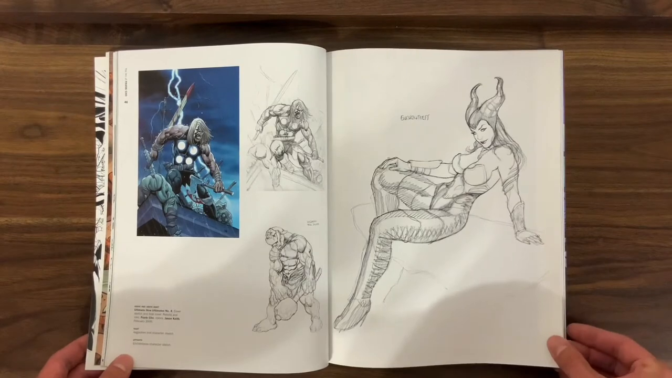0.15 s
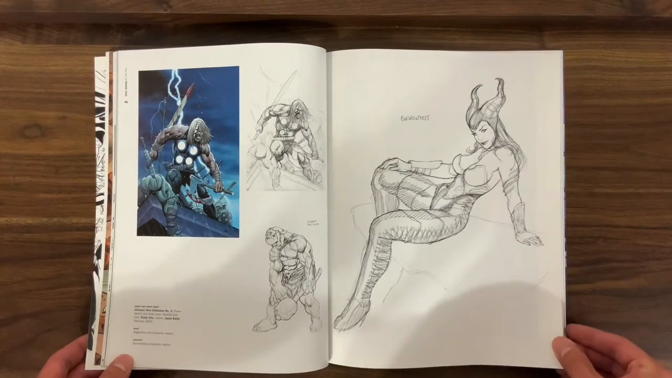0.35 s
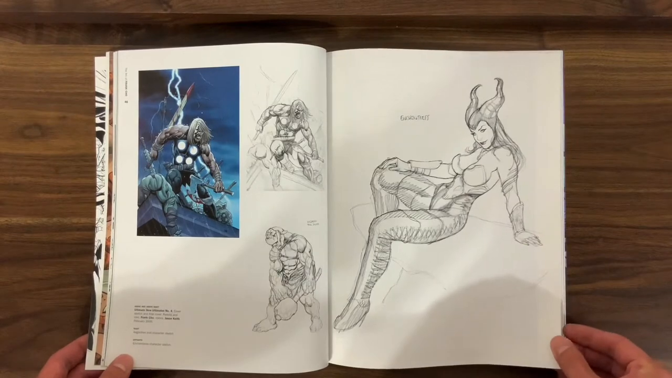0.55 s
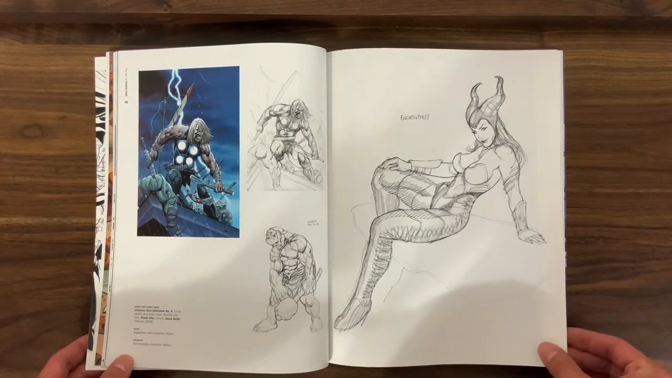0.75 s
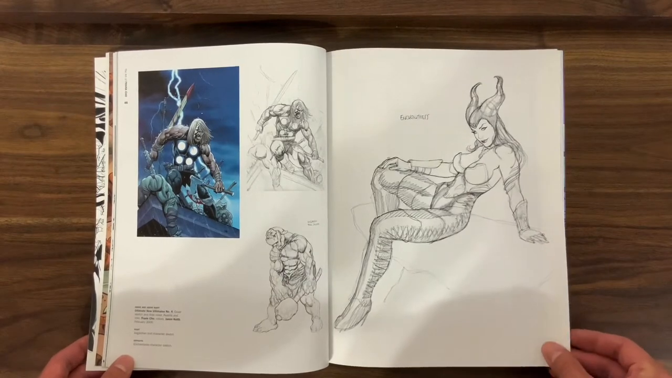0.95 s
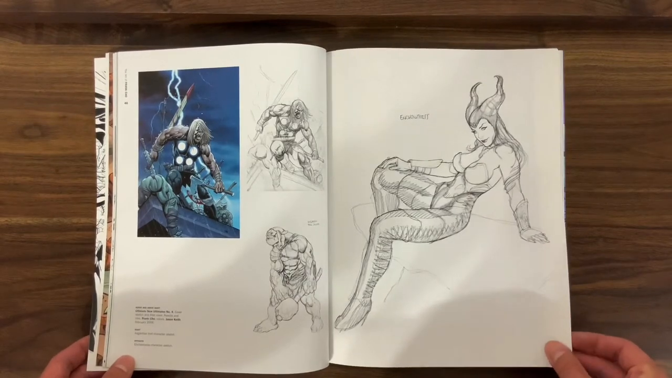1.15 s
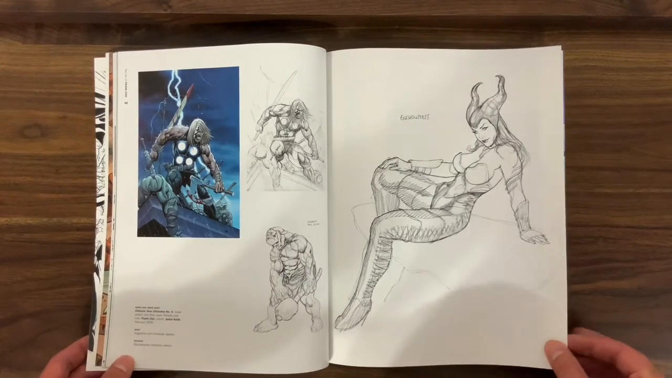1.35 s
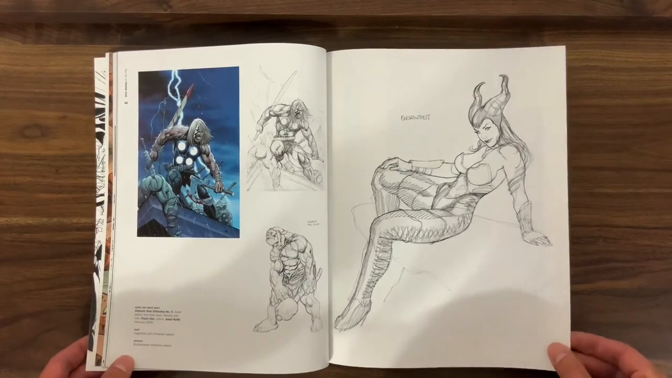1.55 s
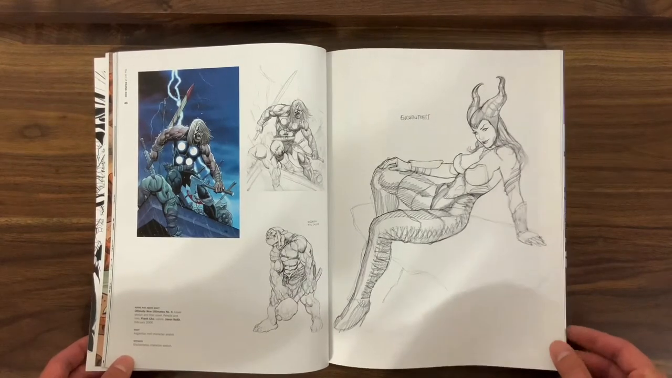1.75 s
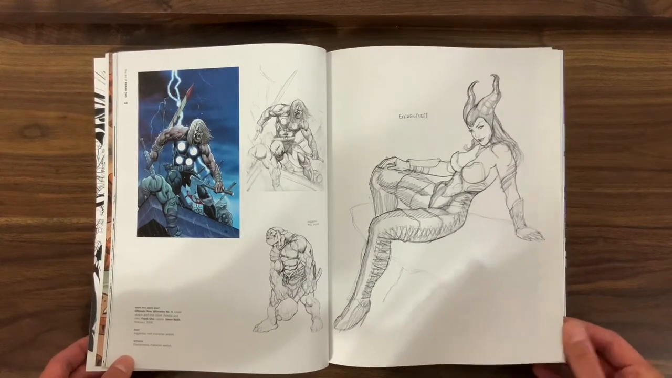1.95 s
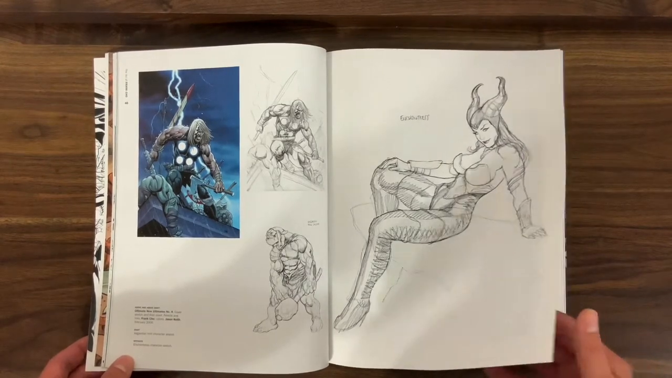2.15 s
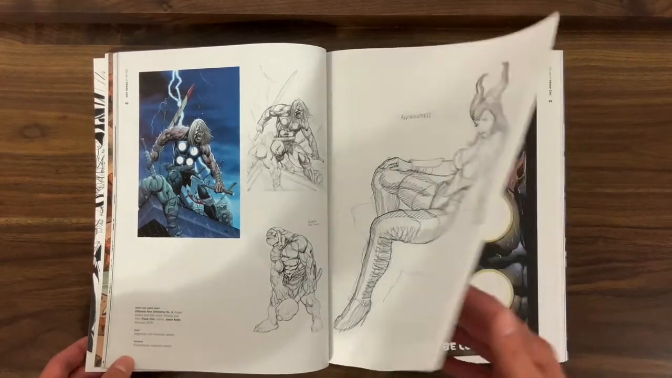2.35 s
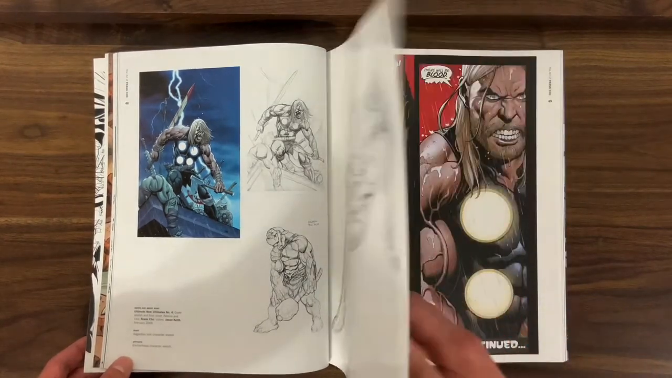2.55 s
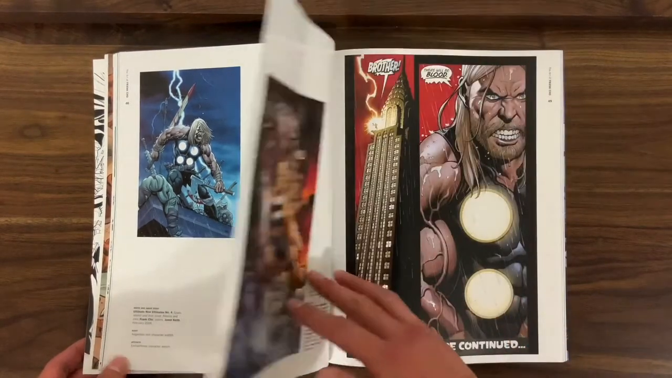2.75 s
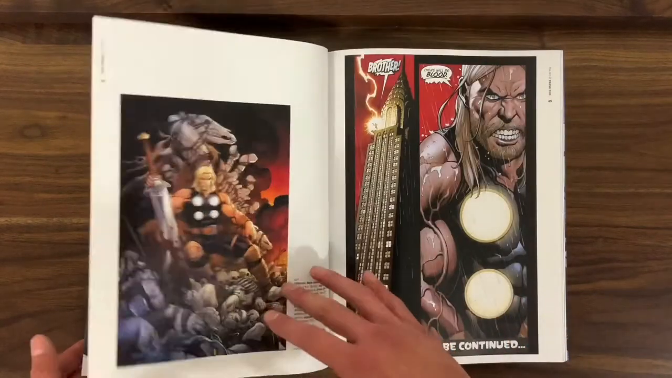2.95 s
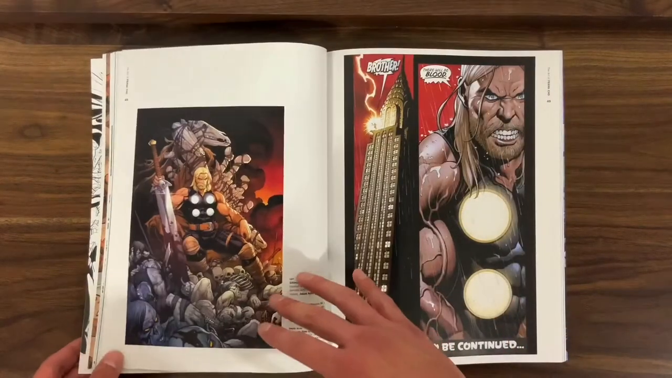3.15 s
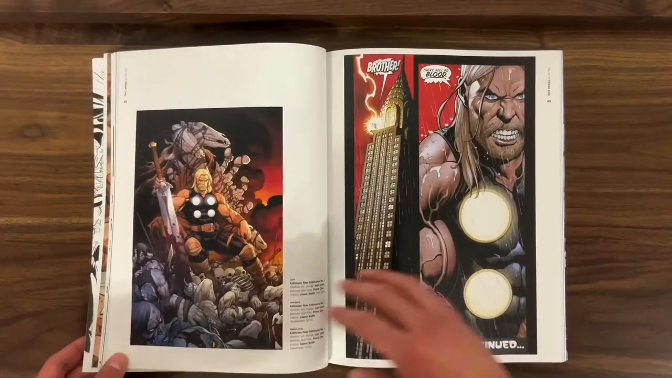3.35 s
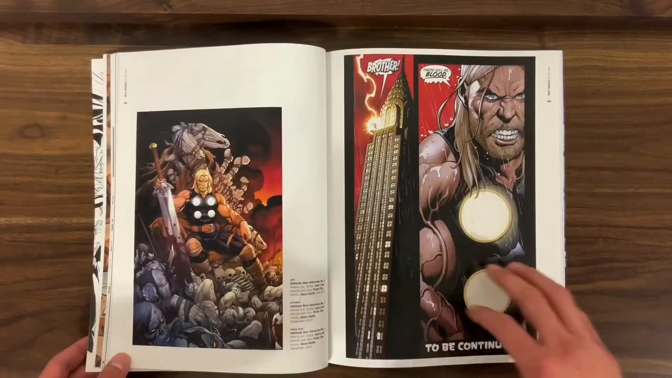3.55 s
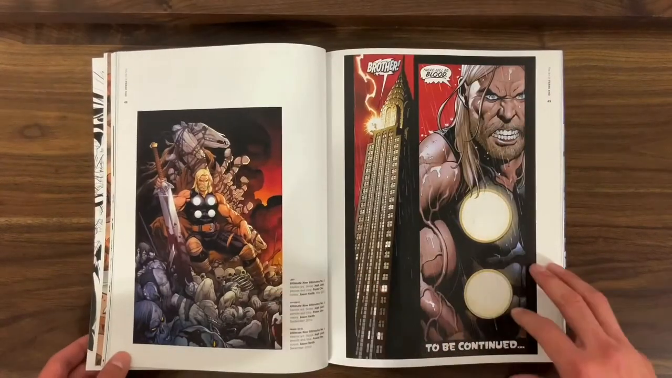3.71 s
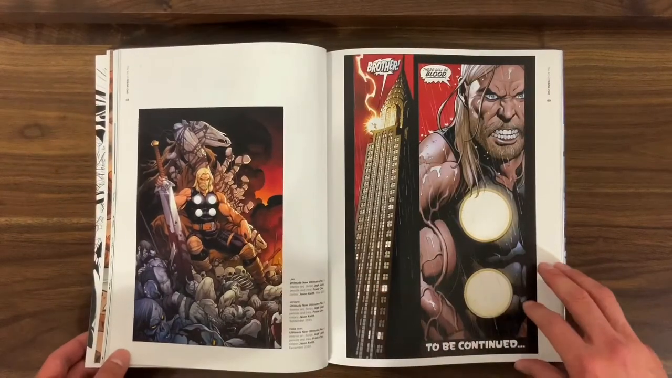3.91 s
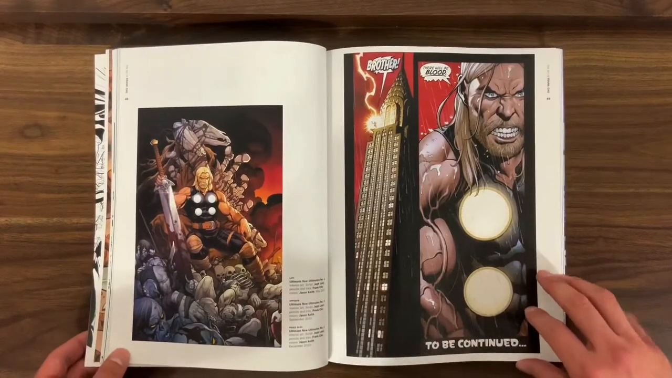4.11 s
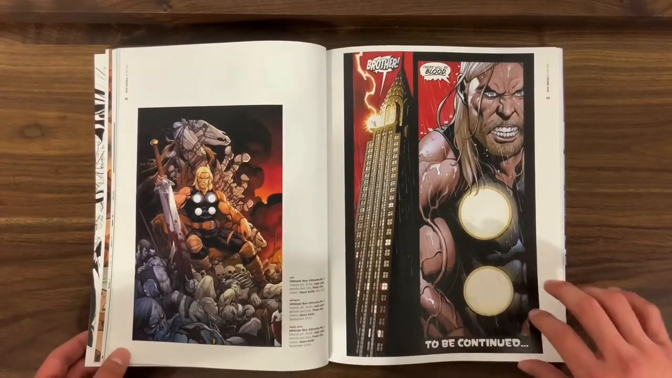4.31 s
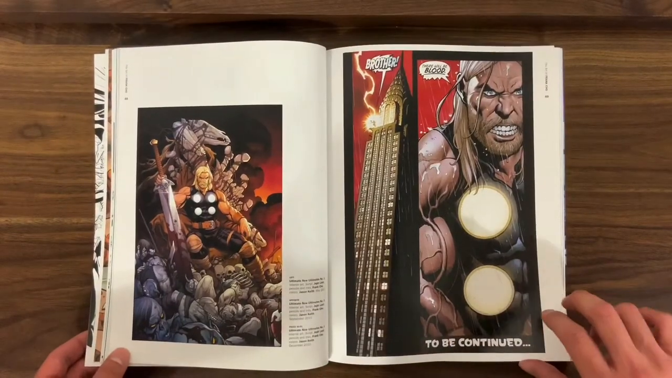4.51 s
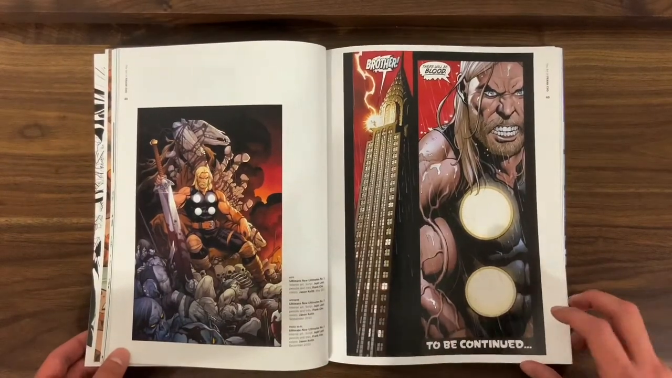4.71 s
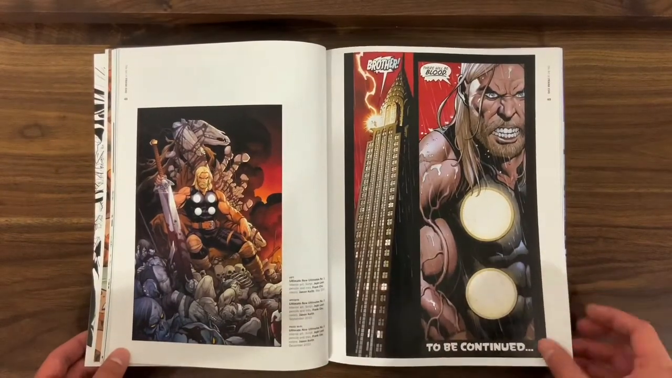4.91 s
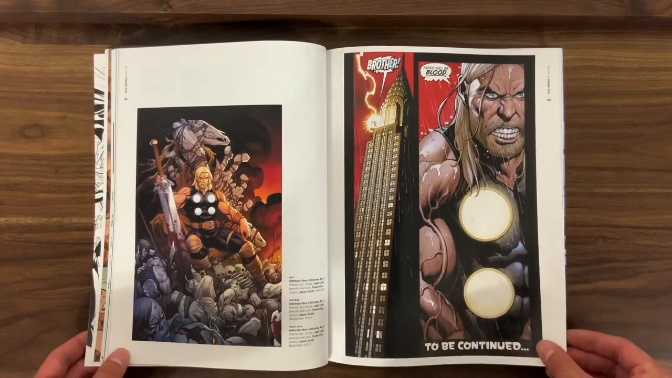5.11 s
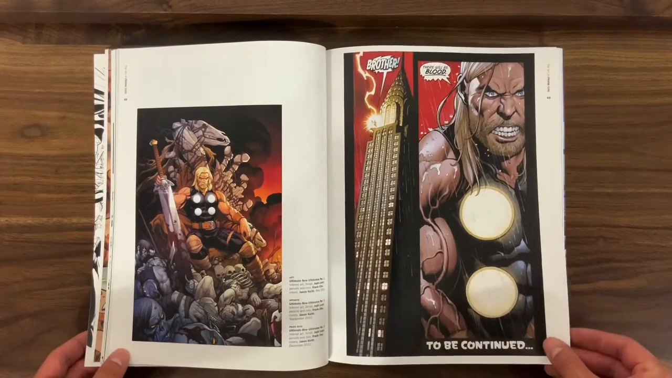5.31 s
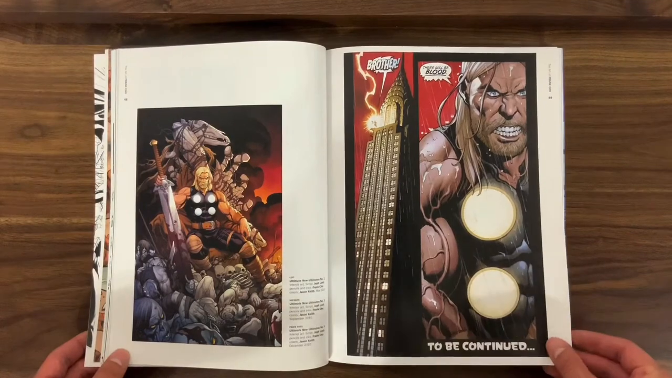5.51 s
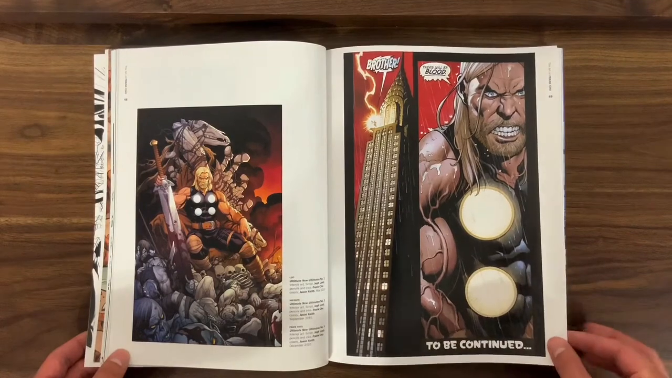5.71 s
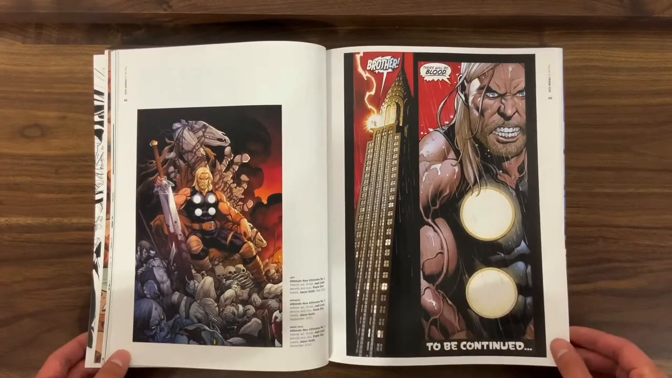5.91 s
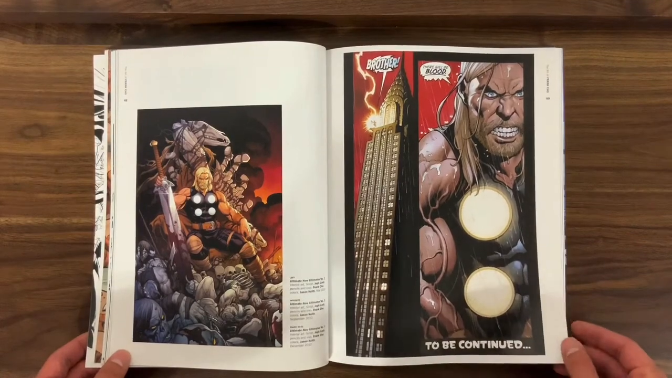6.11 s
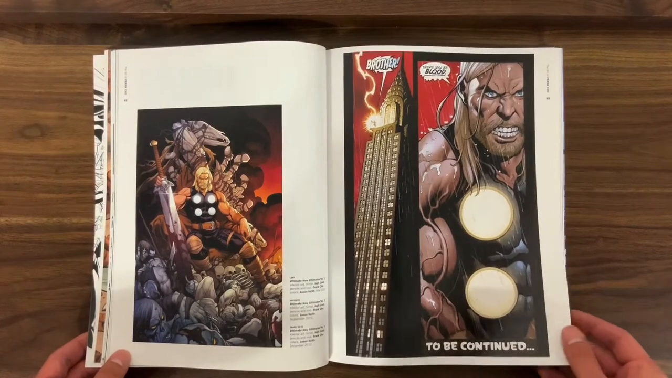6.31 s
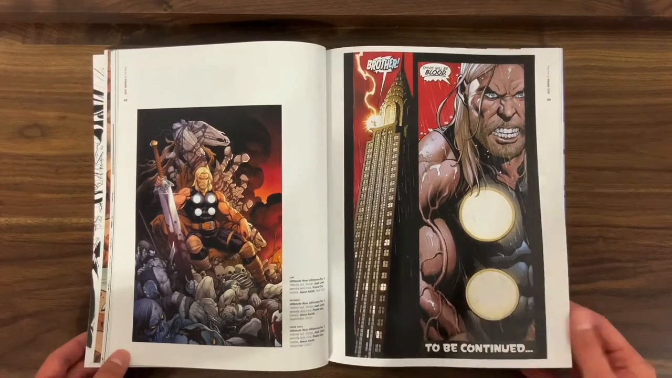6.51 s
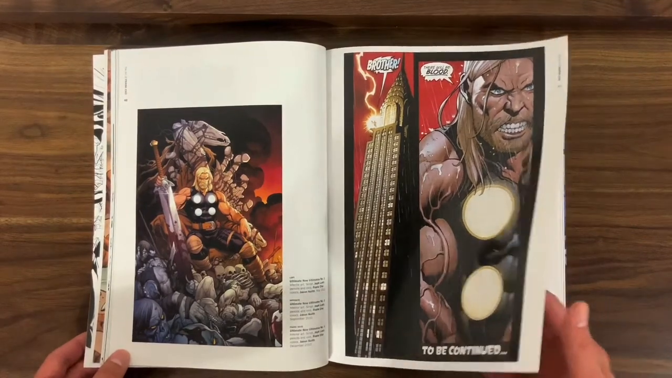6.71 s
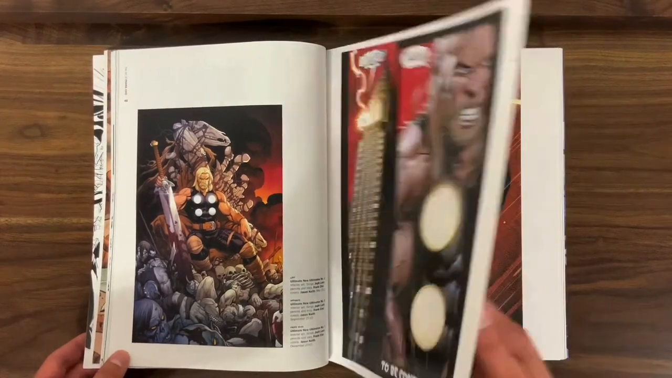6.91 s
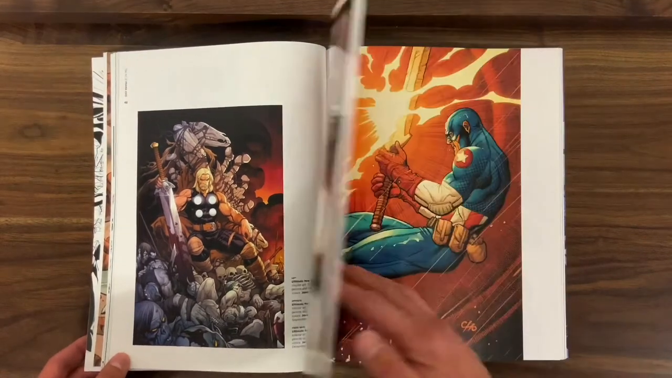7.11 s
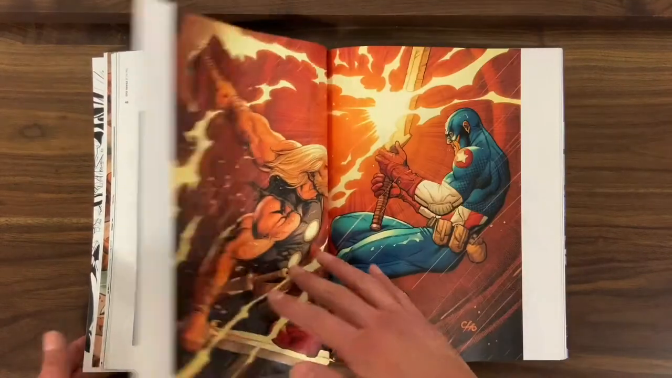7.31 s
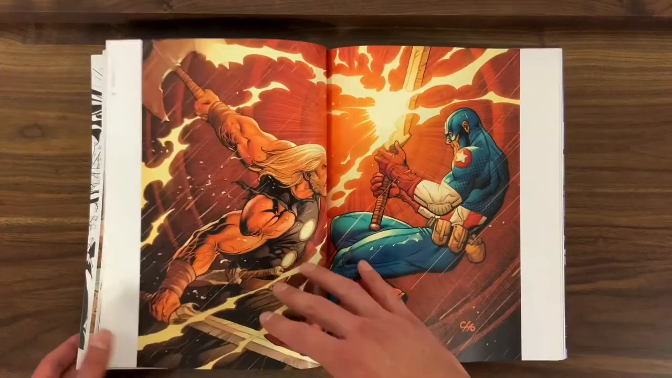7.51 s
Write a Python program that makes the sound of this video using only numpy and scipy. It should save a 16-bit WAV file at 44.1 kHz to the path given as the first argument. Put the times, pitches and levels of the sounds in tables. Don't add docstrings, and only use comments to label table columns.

```python
import sys
import numpy as np
from scipy import signal
from scipy.fft import rfft, irfft, next_fast_len
from scipy.io import wavfile
from scipy.ndimage import uniform_filter1d

SR = 44100
rng = np.random.default_rng(int(sys.argv[2]) if len(sys.argv) > 2 else 0)


def unload_audio(sound):
    columns = np.transpose(np.atleast_2d(sound))
    steps = np.round(np.clip(columns, -1, 1) * 32767)
    wavfile.write(sys.argv[1], SR, steps.astype(np.int16))


def level_to_linear(level):
    exponent = np.asarray(level, float) / 20
    return 10 ** exponent


N = 337806


def evened(x):
    return x / np.sqrt(np.mean(abs(x) ** 2) + 1e-20)


def read(points, hz, column=1):
    columns = np.transpose(points)
    return np.interp(np.log(hz + 1), np.log(columns[0] + 1), columns[column])


def spectrum(points, hz):
    return evened(level_to_linear(read(points, hz)))


def follow(rows, t):
    s, *columns = np.transpose(rows)
    return [np.interp(t, s, c) for c in columns]


def coloured(x, gain_of_hz):
    size = next_fast_len(x.shape[-1])
    gain = gain_of_hz(np.fft.rfftfreq(size, 1 / SR))
    return irfft(rfft(x, size) * gain, size)[..., :x.shape[-1]]


def add(mix, s, sound):
    part = mix[round(s * SR):][:len(sound)]
    part += sound[:len(part)]


def slips(per_s, spread_db, clump_db, smooth_share):
    struck = rng.random(N) < per_s / SR
    size = level_to_linear(spread_db * np.minimum(rng.exponential(1, N), 4)) * struck
    clicks = evened(size * rng.choice([-1., 1.], N))
    clumps = evened(uniform_filter1d(rng.standard_normal(N), size=500))
    grain = np.sqrt(1 - smooth_share) * clicks + np.sqrt(smooth_share) * rng.standard_normal(N)
    return evened(grain * level_to_linear(clump_db * clumps))


def shaped(drive, gain, patchy_db):
    hz, t, z = signal.stft(drive, SR, nperseg=256, noverlap=192)
    patches = rng.standard_normal(z.shape)
    patches = uniform_filter1d(patches, size=4, axis=0)
    patches = evened(uniform_filter1d(patches, size=50, axis=1))
    z = z * gain(hz[:, None], t) * level_to_linear(patchy_db * patches)
    return signal.istft(z, SR, nperseg=256, noverlap=192)[1][:N]


def swells(t, start, hold, level_db, rise_db_s, fall_db_s):
    drop_db = fall_db_s * np.maximum(t - start - hold, 0)
    onset = level_to_linear(level_db - rise_db_s * np.maximum(start - t, 0))
    return onset * np.maximum(level_to_linear(-drop_db), level_to_linear(-19.5 - drop_db / 3.84))


def blended(gains, traits):
    total = np.sum(gains, axis=0)
    return [20 * np.log10(total), *(np.transpose(traits) @ np.array(gains) / total)]


# t/s, hold/s, level/dB, fine hiss/dB, squeak f/Hz
FLICKS = [(.063, 0.036, -64, -21, 3920), (.178, 0.003, -57, -15, 3900), (.289, 0.075, -63.5, -10, 8550),
          (.415, 0.044, -67, -3, 6360), (.562, 0.011, -58, -15, 5400), (1.005, 0.14, -63.5, -3.5, 11600),
          (1.457, 0.023, -62.5, -2.5, 4140), (1.57, 0.0054, -58, 8, 3460), (1.602, 0.0059, -72, 3, 3480),
          (1.711, 0.038, -60.5, -19, 3840), (2.735, 0.025, -68, -1, 6400), (3.158, 0.0073, -79, 25, 5900),
          (3.858, 0.018, -77, 9, 11300), (4.667, 0.029, -60, -1, 4300), (4.705, 0.072, -67.5, -2.5, 8000),
          (4.996, 0.0075, -60.5, 2, 9200), (5.52, 0.058, -61.5, -5, 12600), (5.825, 0.064, -63, -4, 6500),
          (5.943, 0.043, -60, -4, 8200), (6.0, 0.034, -60, -1, 8650), (6.035, 0.041, -60.5, -1, 3570),
          (6.1, 0.018, -51, -7.5, 3660), (6.125, 0.02, -62, -11, 8400), (6.452, 0.013, -62, -0.5, 6550)]
# t/s, hold/s, level/dB, fine hiss/dB, squeak f/Hz
SLIDES = [(.2, 0.057, -78, -12, 4000), (.6, 0.078, -74.5, -15, 6000), (.69, 0.072, -62.5, -5.5, 4940),
          (.83, 0.016, -70, 5, 7000), (.865, 0.059, -60.5, -1, 5140), (1.16, 0.066, -59, -4.5, 4020),
          (1.24, 0.058, -62, 1.5, 5360), (1.42, .03, -71.5, -14, 3980), (1.78, 0.034, -48.5, -14, 5400),
          (1.885, 0.058, -55.5, -8.5, 6700), (2.0, 0.082, -72.5, 8.5, 8000), (2.1, 0.21, -69, 6, 6240),
          (2.33, 0.12, -73.5, 7.5, 6500), (2.8, 0.39, -79.5, -10, 6050), (3.2, 0.058, -76, -20, 7850),
          (3.68, 0.16, -76, 1.5, 5870), (4.78, 0.15, -79.5, -8, 4430), (5.03, 0.11, -68.5, -7.5, 4300),
          (5.15, 0.036, -67, 4, 7700), (5.22, 0.073, -58.5, -1, 7950), (5.6, 0.034, -72, 3, 8000),
          (5.64, 0.037, -70.5, 9.5, 8300), (5.76, 0.05, -68, -10, 8140), (6.17, 0.085, -77, -17, 7800),
          (6.48, 0.047, -68.5, -8, 8000), (6.55, 0.03, -77.5, -6, 10900), (6.62, 0.14, -66.5, 3, 6400),
          (6.78, 0.13, -69.5, 1.5, 10500), (7.15, .06, -83, -16, 3500), (7.28, 0.13, -70.5, -14, 3900),
          (7.43, 0.074, -78, 9, 6300), (7.56, 0.11, -83, 3, 6040), (.49, 0.045, -83, -11, 4500),
          (1.495, 0.015, -80, 0, 10000), (1.548, .015, -89, 3, 11000), (1.72, 0.022, -69, 6, 11500),
          (1.965, .03, -73, -4, 7000), (6.22, .06, -80, -9, 8000), (.78, .04, -71, -5, 4500),
          (6.425, .02, -80, -2, 6500)]
# t/s, hold/s, level/dB, fine hiss/dB, squeak f/Hz
LIFTS = [
    (.93, 0.07, -64.5, -3, 4530),
    (1.55, 0.054, -66.5, -21, 3630),
    (2.5, 0.18, -78.5, -12, 6340),
    (3.35, 0.0072, -90, -13, 3500),
    (5.31, 0.042, -61.5, -3.5, 4070),
    (5.4, 0.044, -66, -0.5, 3840),
    (6.974, 0.019, -66, 0.5, 3560),
    (7.02, 0.1, -74.5, -3, 6300),
]


def touch(t):
    kinds = (FLICKS, (1800, 550, 0.9)), (SLIDES, (850, 386, -2.1)), (LIFTS, (510, 224, 11.5))
    gains = [level_to_linear(-100 + 0 * t)]
    traits = [(-1, 7.5, 6000)]
    for table, (rise_db_s, fall_db_s, hollow_db) in kinds:
        for s, hold, level_db, hiss_db, squeak_hz in table:
            gains.append(swells(t, s, hold, level_db, rise_db_s, fall_db_s))
            traits.append((hiss_db, hollow_db, squeak_hz))
    return blended(gains, traits)


# f/Hz, density/dB per Hz
RUB_COLOUR = [(1200, -21), (2600, -17.5), (3400, 8), (4300, 0), (5800, 1), (7000, 0), (8600, -0.5),
              (9500, -19), (11000, -37)]
# f/Hz, density/dB per Hz
HISS_COLOUR = [(7500, -14), (9000, 2.5), (10300, 5), (12000, 5.5), (13800, 1.5), (15500, -3.5),
               (17000, -29)]
# f/Hz, density/dB per Hz
HOLLOW_COLOUR = [(900, -38), (1500, -3), (2050, 6.5), (2500, 6), (2800, 3.5), (3150, -3.5), (3900, -62)]


def fingers():
    def gain(hz, t):
        level_db, hiss_db, hollow_db, squeak_hz = touch(t)
        drift = abs(np.gradient(np.log(squeak_hz), t))
        steady = np.exp(-drift / 4.4) * np.clip((level_db + 92) / 8, 0, 1)
        squeak = level_to_linear(6.7 * steady * np.exp(-(np.log(hz / squeak_hz + 1e-9) / 0.096) ** 2))
        body = spectrum(RUB_COLOUR, hz) + spectrum(HISS_COLOUR, hz) * level_to_linear(hiss_db)
        hollow = spectrum(HOLLOW_COLOUR, hz) * level_to_linear(hollow_db - 6.5)
        return level_to_linear(level_db) * (body * squeak * level_to_linear(-4.0) + hollow)
    return shaped(slips(per_s=3000, spread_db=4.5, clump_db=1.3, smooth_share=.55), gain, patchy_db=2.6)


# t/s, hold/s, level/dB, depth/dB
BENDS = [(0.183, 0.21, -74, -0.5), (0.726, 0.16, -70.5, -2), (0.927, 0.37, -69.5, 1),
         (1.454, 0.0051, -62, -1), (1.566, 0.038, -58.5, -1), (1.72, .005, -59, -3.5),
         (1.801, 0.045, -62.5, -4.5), (1.923, 0.022, -58.5, -5), (2.007, 0.43, -75.5, -4),
         (2.501, 0.058, -65, 11), (2.675, 0.14, -70.5, 6), (2.793, 0.12, -76.5, 4.5),
         (4.717, 0.028, -61.5, -12.5), (4.795, 0.045, -76.5, 10.5), (5.017, 0.07, -73.5, -2),
         (5.237, 0.23, -68.5, -4.5), (5.542, 0.044, -76, 7), (5.882, 0.29, -74.5, -1.5),
         (6.53, 0.29, -75.5, -1), (6.988, 0.06, -60, 4), (7.116, 0.12, -75, 8), (7.49, 0.017, -69, 8)]
# f/Hz, density/dB per Hz
SHEET_COLOUR = [(500, -97), (750, 2), (1050, 7), (1400, 11), (1750, 3.5), (2300, 0.5), (3200, -33)]
# f/Hz, density/dB per Hz
DEPTH_COLOUR = [(150, 11.5), (220, 17.5), (300, 17.5), (400, 3), (600, 11), (750, 10), (1000, -76)]


def bending(t):
    gains = [swells(t, s, hold, level_db, rise_db_s=400, fall_db_s=330) for s, hold, level_db, _ in BENDS]
    flat = level_to_linear(-83.5 + 0 * t)
    return blended(gains + [flat], [row[3:] for row in BENDS] + [(11.45,)])


def sheet():
    def gain(hz, t):
        level_db, depth_db = bending(t)
        return level_to_linear(level_db) * (spectrum(SHEET_COLOUR, hz) + spectrum(DEPTH_COLOUR, hz) * level_to_linear(depth_db))
    return shaped(slips(per_s=3000, spread_db=2.5, clump_db=.8, smooth_share=.6), gain, patchy_db=1.5)


# t/s, length/s, level/dB, from f/Hz, to f/Hz
SWEEPS = [(0.239, 0.07, -64.5, 10600, 7000), (0.794, 0.14, -65, 11300, 4100),
          (2.5, 0.27, -79.5, 6400, 6400), (2.83, 0.38, -69.5, 5800, 6160), (3.943, 0.097, -77, 4400, 5600),
          (3.95, 0.074, -74.5, 6300, 6300), (4.74, 0.08, -69, 4500, 4600), (4.06, .05, -83, 11600, 5700),
          (4.28, .05, -88, 7500, 6500), (4.57, .05, -87, 7500, 8700), (3.32, 0.046, -80.5, 3200, 5200),
          (4.75, 0.021, -65, 8500, 6500), (4.375, 0.05, -82, 5900, 7100), (4.385, 0.043, -82, 8500, 8500),
          (5.225, 0.075, -56, 6600, 3500), (5.0, 0.115, -68, 4500, 4300), (5.39, 0.074, -66, 12000, 12000),
          (5.52, .065, -63, 12000, 12500), (5.25, 0.054, -66, 12500, 13000), (6.095, .055, -58, 8300, 8400),
          (7.49, .13, -77, 5900, 5900), (2.47, 0.077, -74, 8600, 9000), (2.6, 0.085, -77, 9200, 9300),
          (6.5, 0.09, -69, 10800, 10600), (5.165, 0.053, -58, 14000, 10400), (5.1, 0.15, -59, 8100, 6700),
          (5.21, 0.057, -51.5, 8200, 8200), (6.253, 0.35, -75, 7600, 5500), (7.33, 0.41, -73.5, 5200, 7700),
          (5.555, 0.11, -60, 4300, 5500)]


def gap_whistle():
    def gain(hz, t):
        out = np.zeros((len(hz), len(t)))
        for start, length, level_db, from_hz, to_hz in SWEEPS:
            on = (t > start) & (t < start + length)
            u = (t[on] - start) / length
            glide = np.log2(to_hz / from_hz)
            width_octaves = .14 + 0.3 * abs(glide)
            offset = np.log2(hz / from_hz + 1e-9) - glide * u
            band = np.exp(-(offset / width_octaves) ** 2)
            out[:, on] += level_to_linear(level_db + 9.0) * np.sqrt(np.sin(np.pi * u)) * band
        return out
    return shaped(slips(per_s=3000, spread_db=3.0, clump_db=1.5, smooth_share=.7), gain, patchy_db=2.0)


def dip_ahead(times, depth, hold_s):
    ahead = np.append(np.sort(times), np.inf)
    t = np.arange(N) / SR
    wait = ahead[np.searchsorted(ahead, t)] - t
    return 1 - depth * np.exp(-(wait / hold_s) ** 2)


# t/s, peak level/dB, ring f/Hz, treble/dB
KNOCKS = [(.062, -59, 3860, -15), (1.004, -42.5, 1950, -2), (1.04, -50, 2000, -8), (1.1108, -43, 1900, -6),
          (1.148, -45, 2210, -8), (1.4537, -43.5, 1910, -3.5), (1.569, -46, 1830, -6),
          (1.6016, -39.5, 1550, -1.5), (1.7092, -32.5, 1950, -11), (5.9423, -42.5, 2230, 1),
          (6.963, -48.5, 2200, 7)]
# t/s, peak level/dB, ring f/Hz, treble/dB
CRACKS = [(.1761, -43, 2220, -5), (0.2882, -42, 2370, -0.5), (0.9596, -56, 1770, -8),
          (1.0949, -49.5, 2140, -6), (1.1956, -48, 2100, -8), (1.9505, -51, 2080, 6), (2.735, -57, 1500, 7),
          (3.1558, -59.5, 6040, 5), (3.859, -57, 6300, 8.5), (4.702, -48.5, 1840, 7),
          (5.3931, -54, 3570, -8), (5.495, -46, 1870, -4), (5.5297, -58, 2200, -6),
          (6.036, -46.5, 3500, -4), (7.1106, -53, 1600, 0)]
# t/s, peak level/dB, ring f/Hz, treble/dB
SHORT_SNAPS = [(.567, -49.5, 4660, -3), (.58, -50.5, 6400, -3), (7.623, -65, 6000, 12.5),
               (0.3325, -53, 2110, 10.5), (.3566, -55, 2100, 5), (1.7472, -40, 2250, -2),
               (1.7025, -56, 2200, -15), (7.483, -65, 4100, 9), (4.659, -58, 2000, -10), (1.872, -54, 3500, -5),
               (2.7447, -54.5, 2080, 8.5), (3.8137, -60.5, 6200, 7), (5.8224, -51, 2070, -7),
               (5.6, -47.5, 2100, -12), (6.1, -44, 3450, -7), (6.458, -52.5, 2550, -15), (.741, -58, 1500, -10),
               (.817, -54, 1900, -12), (.8394, -55, 1400, -5), (.925, -51, 2100, -9), (0.91, -46.5, 2100, -7),
               (1.545, -49.5, 1670, -11.5), (1.7865, -53, 5800, -7), (1.7, -62, 1600, -5), (5.5533, -57, 4800, 2),
               (6.042, -53, 2200, -4), (6.111, -60, 2100, -12), (7.083, -61, 1400, -15), (.6492, -64, 4200, -5),
               (.6836, -62, 4800, 3), (1.1, -59, 4500, 0), (1.7068, -53, 7500, -7), (1.7452, -57, 3940, 0),
               (5.1605, -59, 6000, 3), (5.2173, -60, 7500, 0), (5.6723, -62, 5300, -1), (5.7566, -70, 5700, 0),
               (2.5425, -52, 1300, -16), (7.022, -48, 1500, -20), (6.153, -57, 4000, 0), (7.438, -63, 1500, -10),
               (3.105, -66, 4600, 0), (3.795, -63, 4500, 3)]


def snaps():
    out, t = np.zeros(N), np.arange(3000) / SR
    bright = signal.butter(1, [2500, 14000], "band", fs=SR, output="sos")
    body = signal.butter(2, 5500, fs=SR, output="sos")
    low = signal.butter(2, [550, 3200], "band", fs=SR, output="sos")
    crack = level_to_linear(-60 * t / .004) * np.minimum(t / .0001, 1)
    ring_fade = level_to_linear(8.0 - 60 * t / 0.006) * np.minimum(t / .0004, 1)
    echo = round(0.005 * SR)
    kinds = (KNOCKS, (3, 0.012)), (CRACKS, (-0.85, 0.047)), (SHORT_SNAPS, (0, 0.031))
    rows = [(*row, *kind) for table, kind in kinds for row in table]
    for s, peak_db, hz, treble_db, low_db, tail_s in rows:
        noise = rng.standard_normal(len(t))
        fade = crack + 0.39 * level_to_linear(-60 * t / tail_s) * np.minimum(t / 0.0026, 1)
        ring = (np.sin(2 * np.pi * hz * t) + .3 * np.sin(4 * np.pi * hz * t)) * ring_fade
        ring = ring + level_to_linear(-23.0) * np.roll(ring, echo)
        knock = 2.06 * level_to_linear(low_db) * signal.sosfilt(low, noise[::-1] * fade)
        click = 0.42 * (t == t[3])
        sharp = signal.sosfilt(bright, noise * fade + click)
        dull = signal.sosfilt(body, sharp)
        add(out, s, level_to_linear(peak_db) * (dull + level_to_linear(treble_db) * (sharp - dull) + ring + knock))
    return out


# t/s, peak level/dB, rise/s, tail/s, lowest f/Hz
FLOPS = [
    (1.236, -35, 0.003, 0.046, 450),
    (2.477, -33.5, 0.0079, 0.063, 150),
    (2.537, -32, 0.0065, 0.44, 180),
    (4.702, -30.5, 0.002, 0.042, 570),
    (6.963, -28.5, 0.013, 0.45, 171),
    (7.019, -31, .0015, 0.033, 900),
    (2.542, -30.5, 0.0033, 0.05, 500),
    (7.016, -40, 0.004, 0.56, 198),
]
# f/Hz, density/dB per Hz
FLOP_COLOUR = [(150, 7), (230, -12), (400, -8), (700, -5.5), (1100, -3), (1700, -3.5), (2200, -6.5),
               (2900, -13), (3600, -18.5), (4500, -34), (6500, -79)]
# f/Hz, width/Hz, level/dB
SHEET_RINGS = [(393, 20, 14), (516, 24, 10), (653, 21, 8), (1050, 35, 7.5), (1300, 40, 3.5), (1600, 39, 10),
               (1706, 30, 2), (2025, 50, 10)]


def flops():
    def gain(hz):
        rings_db = sum(db / (1 + (2 * (hz - f) / w) ** 2) for f, w, db in SHEET_RINGS)
        return level_to_linear(read(FLOP_COLOUR, hz) + rings_db)
    out, t = np.zeros(N), np.arange(16000) / SR
    crackle = slips(per_s=4000, spread_db=2.5, clump_db=.7, smooth_share=.6)
    crackle = evened(coloured(crackle, gain))
    dull = signal.sosfilt(signal.butter(3, 2200, fs=SR, output="sos"), crackle)
    treble = crackle - dull
    for s, peak_db, rise_s, tail_s, lowest_hz in FLOPS:
        at = slice(round(s * SR), round(s * SR) + len(t))
        treble_fade = level_to_linear(-60 * t / (0.26 * tail_s)) + 0.22 * level_to_linear(-60 * t / (0.92 * tail_s))
        treble_gain = 1.22 * level_to_linear(peak_db + 29)
        burst = dull[at] * level_to_linear(-60 * t / tail_s) + treble_gain * treble[at] * treble_fade
        burst = signal.sosfilt(signal.butter(3, lowest_hz, "high", fs=SR, output="sos"), burst)
        add(out, s, level_to_linear(peak_db - 6.5) * burst * np.minimum(t / rise_s, 1))
    return out


# f/Hz, level/dB, t60/s
STACK = [(652, -2.5, 0.11), (684, 0, 0.047), (1070, -13, .026), (1320, -8, 0.028), (1650, -4, 0.045)]


def tap():
    out, t = np.zeros(N), np.arange(4000) / SR
    ring = sum(level_to_linear(db - 60 * t / t60) * np.sin(2 * np.pi * hz * t) for hz, db, t60 in STACK)
    add(out, 4.702, level_to_linear(-47.5) * ring * np.minimum(t / 0.0037, 1))
    return out


def scattered(x, t60_s, turns_per_s):
    at = np.arange(20, 8000, 20) + rng.integers(0, 20, (3, 399))
    echoes = rng.choice([-1., 1.], at.shape) * level_to_linear(-60 * at / SR / t60_s)
    tails = np.zeros((3, 8100))
    np.put_along_axis(tails, at, echoes, axis=1)
    turn = 2 * np.pi * (turns_per_s * np.arange(N) / SR + np.arange(3)[:, None] / 3)
    fed = x * np.cos(turn) * np.sqrt(2 / 3)
    return signal.oaconvolve(fed, tails / np.linalg.norm(tails[0]), axes=1)[:, :N].sum(0)


# t/s, level/dB
RUMBLE = [(0.0, -50.5), (0.1, -54), (0.21, -48.5), (1.2, -49.5), (2.05, -51.5), (2.13, -49), (3.6, -47),
          (3.99, -50), (4.3, -49.5), (4.9, -49), (5.6, -49.5), (7.0, -50), (7.4, -51.5), (7.6, -45),
          (7.66, -48)]
# f/Hz, density/dB per Hz
RUMBLE_COLOUR = [(13, -55), (22, -29), (31, -28), (48, -2.5), (64, -0.5), (81, -2), (125, -6.5), (134, -10),
                 (146, -21.5), (167, -16), (183, -16.5), (216, -22.5), (242, -34.5), (260, -28), (340, -82),
                 (570, -120)]
# f/Hz, width/Hz, level/dB
TONES = [(55.7, 3.7, -67.5), (76.9, 3.7, -55), (85.04, 5.1, -54), (101.6, 0.89, -62), (118.9, 6.9, -55.5),
         (150, 7.4, -69.5), (210.4, 10, -76), (286, 1.2, -79)]
# t/s, tone level/dB, overtone level/dB re tone
MOTOR = [
    (5.1, -65, -20),
    (5.5, -52, -28),
    (5.9, -46, -25),
    (6.3, -49, -15.5),
    (7.0, -46, -13.5),
    (7.2, -59, -6.5),
]
# f/Hz, density/dB per Hz
AIR_COLOUR = [(140, -15.5), (240, -1.5), (476, -24.5), (929, -4.5), (1170, -13), (1440, -6.5),
              (1750, -30.5), (2200, -43), (2570, -34), (3660, -32.5), (4210, -33.5), (6090, -33),
              (7260, -33.5), (15600, -33), (16400, -65)]


def room_tone():
    def modes(hz):
        return sum(level_to_linear(db) * np.sqrt(2 * SR / np.pi / w) / (1 + (2 * (hz - f) / w) ** 2) for f, w, db in TONES)
    t = np.arange(N) / SR
    noise = rng.standard_normal((3, 2, N))
    rumble = level_to_linear(-52.0) * evened(coloured(noise[0], lambda hz: level_to_linear(read(RUMBLE_COLOUR, hz))))
    lines = coloured(noise[1], modes)
    swell = level_to_linear(follow(RUMBLE, t)[0] + 47.5)
    tone_db, overtone_db = follow(MOTOR, t)
    turn = 2 * np.pi * 75.2 * t
    motor = np.sqrt(2) * level_to_linear(tone_db) * (np.sin(turn) + level_to_linear(overtone_db) * np.sin(2 * turn))
    air = level_to_linear(-72) * evened(coloured(noise[2], lambda hz: level_to_linear(read(AIR_COLOUR, hz))))
    return (rumble + lines) * swell + motor + air * level_to_linear(np.array([[-1.5], [3.0]]))


def scene():
    releases = [row[0] for row in [*KNOCKS, *FLOPS]]
    sliding = (fingers() + sheet() + gap_whistle()) * dip_ahead(releases, depth=.5, hold_s=.012)
    sheets = flops()
    paper = sliding + snaps() + sheets + tap()
    near = paper + level_to_linear(-14.5) * scattered(paper, t60_s=0.058, turns_per_s=5.3)
    spread = level_to_linear(-1.2) * paper + level_to_linear(-11.0) * sheets
    apart = scattered(spread, t60_s=.02, turns_per_s=11)
    return np.array([near, apart]) + room_tone()


def low_pass(x):
    return signal.sosfilt(signal.butter(12, 16360, fs=SR, output="sos"), x)


# f/Hz, likeness/0-1, left lead/rad, left-right level/dB
PORTS = [(40, .999, 0, 0), (95, .998, 0, 0), (140, .98, 0, -.5), (330, .7, 0, -.5), (700, .46, 0, 2),
         (1400, .44, 0, -.5), (1720, .65, -.6, .5), (2070, .74, -1.5, 1), (2500, .72, -3.0, 1.5),
         (3050, .66, -4.05, -1), (3450, .85, -4.8, 0), (4130, .77, -5.8, -1), (4800, .87, -5.9, -1),
         (5800, .82, -6.0, -2), (6900, .8, -5.3, -1), (8200, .92, -5.95, 0), (11000, .88, -6.65, 0),
         (15500, .8, -6.9, 0)]


def record(dry):
    def port(side, shared, stretch=1):
        def gain(hz):
            hz = hz * stretch
            same = read(PORTS, hz)
            share = np.sqrt((1 + same) / 2) if shared else side * np.sqrt((1 - same) / 2)
            phase = np.exp(.5j * side * read(PORTS, hz, column=2))
            return share * phase * level_to_linear(.5 * side * read(PORTS, hz, column=3))
        return gain
    sway = uniform_filter1d(rng.standard_normal(N), size=round(.12 * SR))
    sway = evened(uniform_filter1d(sway, size=2000))
    place = .5 + .5 * np.tanh(sway)
    pair = []
    for side in (1, -1):
        one_way = coloured(dry[0], port(side, True, 1.09))
        other_way = coloured(dry[0], port(side, True, .91))
        differing = coloured(dry[1], port(side, False))
        pair.append(place * one_way + (1 - place) * other_way + differing)
    pair = coloured(np.array(pair), lambda hz: hz < 15860)
    return low_pass(pair)


dry = scene()
out = record(dry)
unload_audio(out)
```